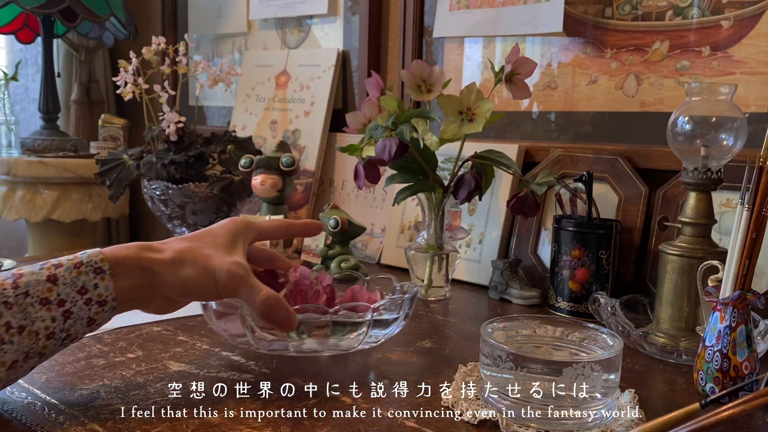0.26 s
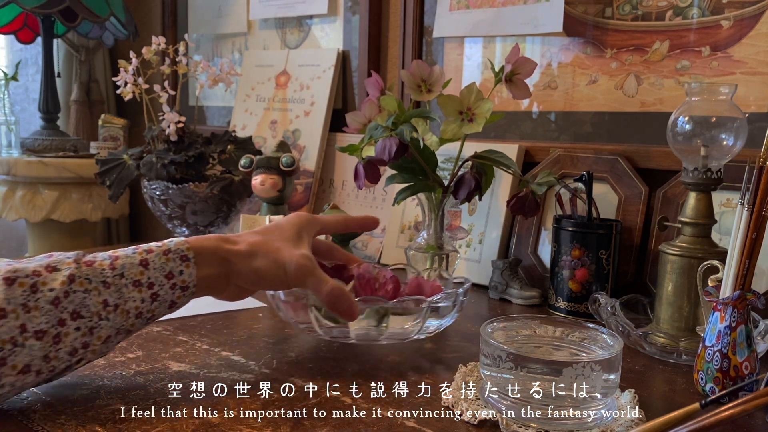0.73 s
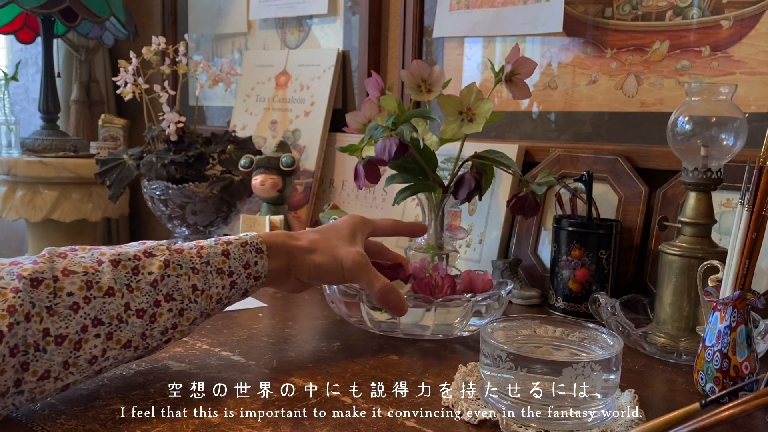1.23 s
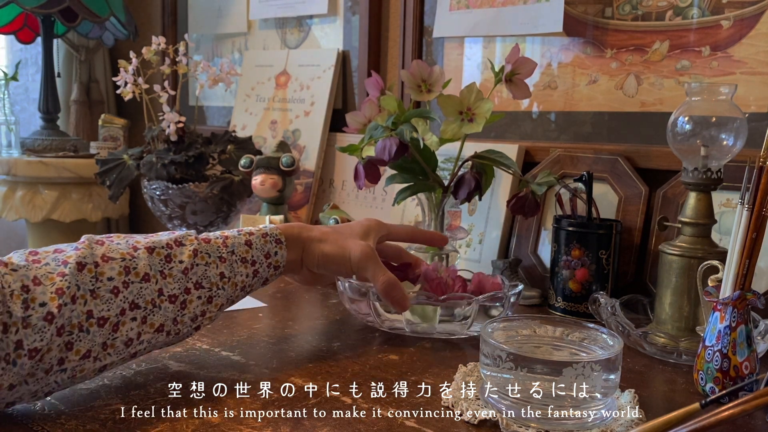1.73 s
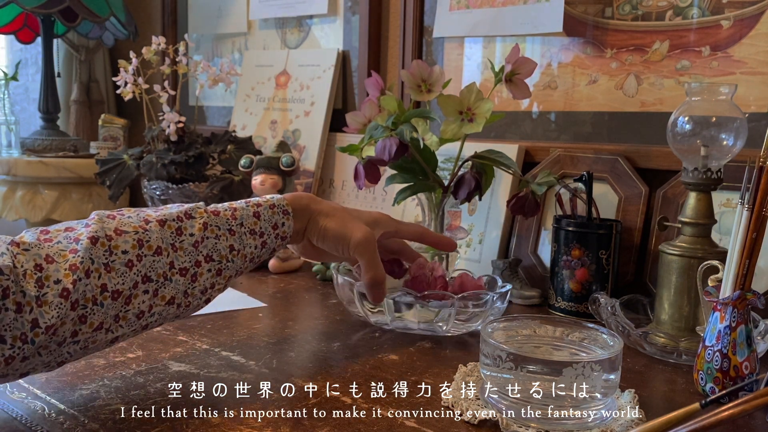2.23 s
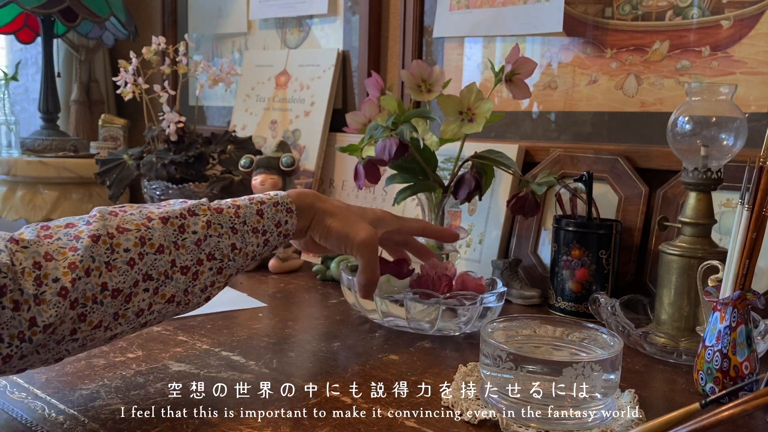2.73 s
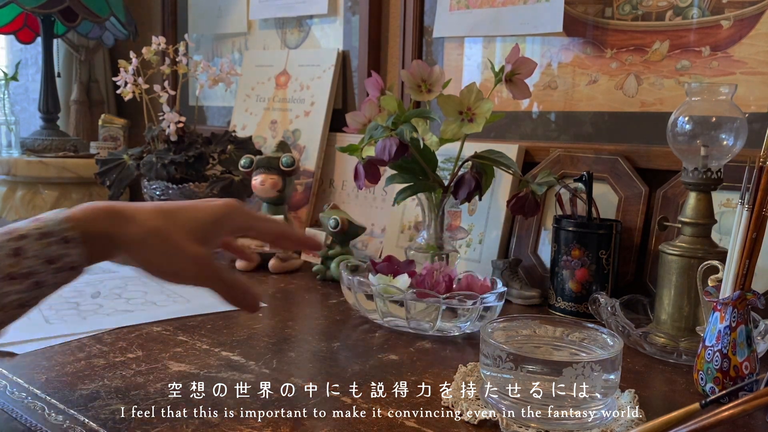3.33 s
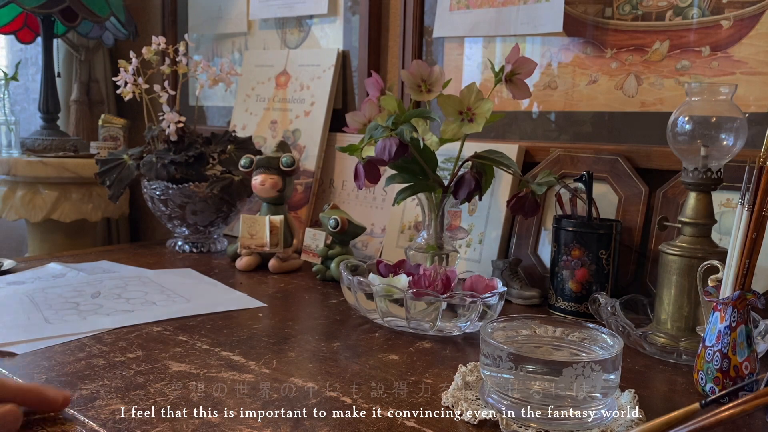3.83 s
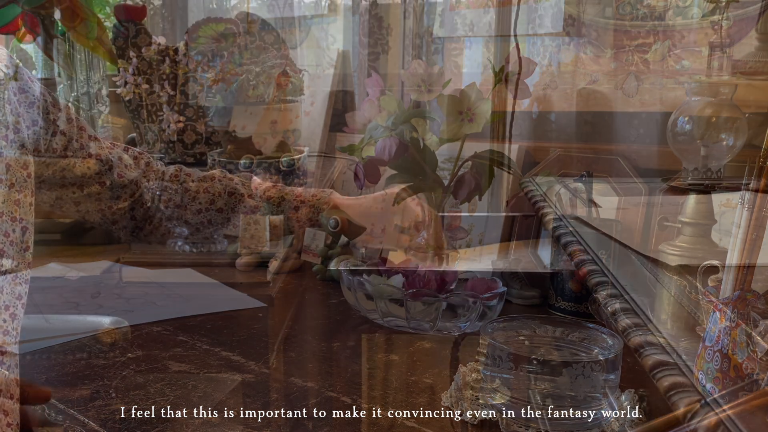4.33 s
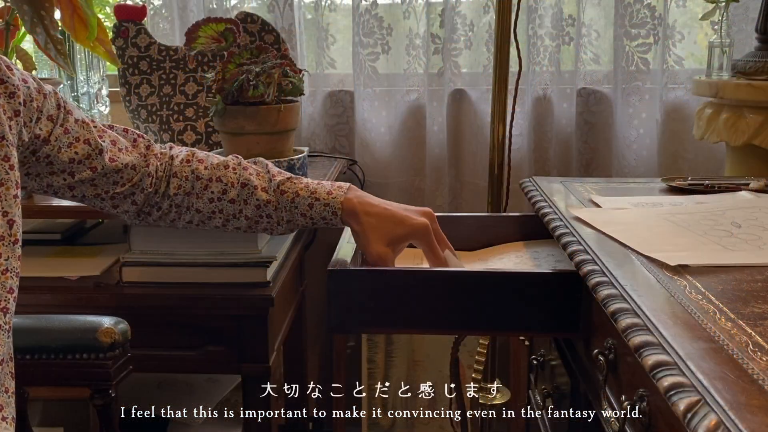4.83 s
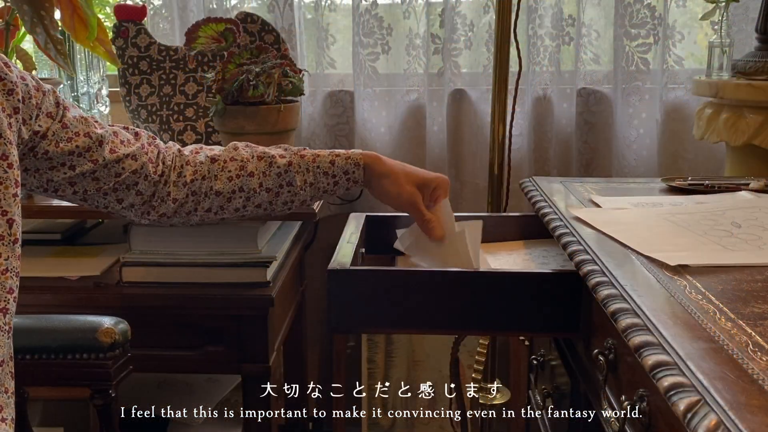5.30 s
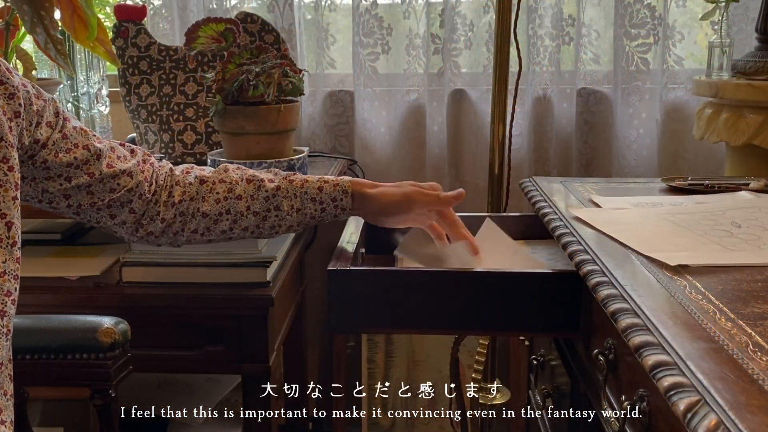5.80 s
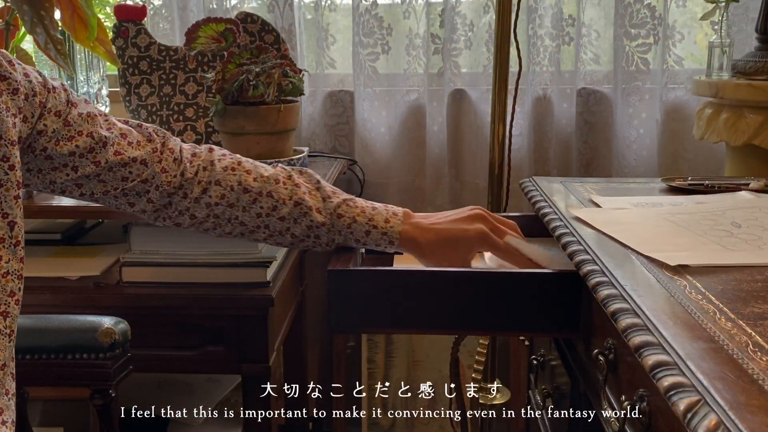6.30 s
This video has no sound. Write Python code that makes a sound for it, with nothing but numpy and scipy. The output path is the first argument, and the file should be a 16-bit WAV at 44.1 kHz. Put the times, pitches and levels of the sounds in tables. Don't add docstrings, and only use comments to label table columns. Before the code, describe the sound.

Faint gritty sliding of glass on wood, one solid bump, a lull, then a hand leafing through crackling paper in a hollow wooden drawer.

```python
import sys
import numpy as np
from scipy import signal
from scipy.fft import rfft, irfft
from scipy.io import wavfile
from scipy.ndimage import uniform_filter1d

SR = 44100
rng = np.random.default_rng(int(sys.argv[2]) if len(sys.argv) > 2 else 0)


def pcm_store(signal):
    levels = np.round(np.clip(np.atleast_2d(signal), -1, 1) * 32767)
    wavfile.write(sys.argv[1], SR, levels.astype(np.int16).T)


def linear_from_db(decibels):
    return 10 ** (np.asarray(decibels, float) / 20)


N = 289296
TIME = np.arange(N) / SR
HZ = np.fft.rfftfreq(N, 1 / SR) + 1
LEFT_RIGHT = np.array([[1], [-1]])

# (time [s], hiss level [dB])
REST = [(3.43, -67), (3.53, -73), (3.67, -56.5), (3.92, -55), (4.14, -57.5), (4.4, -62), (4.53, -59.5),
        (4.72, -55.5), (4.84, -51.5), (5.08, -44.5), (5.24, -51.5), (5.42, -51.5), (5.68, -48.5),
        (5.85, -52), (6, -49), (6.22, -46), (6.39, -49.5), (6.56, -44.5)]


def unit(x):
    return x / np.sqrt(np.mean(x ** 2))


def on_log(points):
    hz, value = np.transpose(points)
    return np.interp(np.log(HZ), np.log(hz), value)


def curves(table):
    s, *columns = np.transpose(table)
    return [np.interp(TIME, s, column) for column in columns]


def band(x, lo_hz, hi_hz, order=2):
    limits = [lo_hz, min(hi_hz, .45 * SR)]
    return signal.sosfilt(signal.butter(order, limits, "band", fs=SR, output="sos"), x)


def colour(x, points):
    return unit(irfft(rfft(x) * linear_from_db(on_log(points)), N))


def walk(rate):
    hold = int(SR / rate)
    steps = np.repeat(rng.standard_normal(N // hold + 1), hold)
    return 1.3 * uniform_filter1d(steps, hold)[:N]


def wide_noise():
    # (pitch [Hz], share [0-1])
    alike = [(60, 0.99), (200, 0.8), (700, .1), (2400, .4), (5000, 0.3),
             (7200, .995), (17000, .995)]
    share = np.clip(on_log(alike), 0, 1)
    mid, side = rfft(rng.standard_normal((2, N)))
    return irfft(mid * np.sqrt(1 + share) + side * np.sqrt(1 - share) * LEFT_RIGHT, N)


def grit(rate, spread_db, smear_ms):
    sizes = linear_from_db(spread_db * np.minimum(rng.exponential(size=N), 3))
    slips = (rng.random(N) < rate / SR) * sizes
    return unit(1 + signal.lfilter([1], [1, -np.exp(-1000 / (smear_ms * SR))], slips))


def fade(t, t60):
    return np.exp(-np.log(1000) * t / t60)


def add(out, s, piece):
    i = int(s * SR)
    out[..., i:i + piece.shape[-1]] += piece[..., :N - i]


def placed(x):
    # (time [s], left minus right [dB])
    hand_side = [
        (0.0, 11.5),
        (0.49, 12),
        (1.0, 8),
        (1.51, 11),
        (2.5, 0),
        (3.23, 5.5),
        (3.82, 1.5),
        (6.56, 3),
    ]
    lean = linear_from_db(curves(hand_side)[0] * LEFT_RIGHT / 2) - 1
    below_treble = np.clip((7000 - HZ) / 1500, 0, 1)
    return x + lean * irfft(rfft(x) * below_treble, N)


def still_air():
    # (pitch [Hz], level per Hz [dB])
    air_tone = [(150, -28.5), (250, -1.5), (450, -6.5), (1110, -16), (1780, -17), (2680, -20.5),
                (7000, -25.5), (11000, -27), (14000, -32), (16500, -41.5)]
    return linear_from_db(-70.5) * colour(wide_noise(), air_tone)


def stirring():
    # (time [s], rumble level [dB])
    stir_level = [(0.0, -53.5), (0.51, -59), (0.8, -57), (1.5, -53.5), (1.94, -60.5), (2.85, -66),
                  (3.69, -56.5), (3.95, -60.5), (4.62, -56.5), (5.06, -49), (5.68, -55), (6.08, -58),
                  (6.36, -53.5), (6.56, -45)]
    # (pitch [Hz], level per Hz [dB])
    rumble_tone = [(12, -57.5), (20, -27.5), (37, -10), (60, -1), (86, -7), (118, -5), (195, -13),
                   (316, -17), (500, -40), (650, -72.5), (1100, -120)]
    level = linear_from_db(curves(stir_level)[0] + 1.6 * walk(6.5))
    return level * colour(wide_noise(), rumble_tone)


def scraping():
    # (time [s], scrape level [dB])
    slide_level = [
        (0.0, -62.5),
        (0.43, -64.5),
        (0.96, -58),
        (1.45, -61.5),
        (1.6, -67),
        (1.95, -69),
        (2.4, -96),
        (3.05, -73.5),
        (3.42, -71.5),
    ]
    # (pitch [Hz], level per Hz [dB])
    scrape_tone = [(250, -28), (450, 3), (1000, -1.5), (1900, -2), (3000, -2.5), (4200, -4.5), (6000, -11),
                   (9000, -6), (13000, -15.5), (16000, -21)]
    scrape = colour(wide_noise() * grit(270, .6, 1.2), scrape_tone)
    return linear_from_db(curves(slide_level)[0] + 0.36 * walk(33)) * scrape * (TIME < 3.42)


def desk_bumps():
    # (time [s], peak level [dB], contact [ms])
    blows = [
        (1.2753, -7.5, 1.94),
        (1.2916, -18, 2.8),
        (1.305, -18.5, 4.5),
        (1.579, -47.5, 2.4),
        (1.833, -45.5, 2.2),
        (6.288, -33, 1),
    ]
    # (pitch [Hz], level [dB], t60 [s], left minus right [dB])
    desk_notes = [(108, -4.5, .26, -0.5), (159.2, -7, .2, 0), (194, -13, .2, 0), (226.8, -10.5, .2, 1),
                  (285.3, -11.5, .13, 4), (319, -10, 0.19, -5), (367.3, -3, .13, 2), (407.7, -16, 0.18, -8),
                  (439.6, -8, .12, -7), (495, -11, .1, 0), (539, -5, .065, -8), (597, -9.5, .05, -6),
                  (739, -23, .1, 0)]
    out, t = np.zeros((2, N)), np.arange(int(.5 * SR)) / SR
    top = np.zeros((2, len(t)))
    for k, (hz, db, t60, lean_db) in enumerate(desk_notes):
        swing = (-1) ** k
        sides = linear_from_db(db + lean_db * LEFT_RIGHT / 2)
        top += swing * sides * np.sin(2 * np.pi * hz * t) * fade(t, t60)
    for s, db, ms in blows:
        push = np.hanning(max(int(ms * SR / 1000), 3))
        blow = signal.fftconvolve(top, push[None])
        add(out, s, linear_from_db(db + 4.0) * blow / np.abs(blow).max())
    return out


def tones(table):
    out, t = np.zeros((2, N)), np.arange(int(.5 * SR)) / SR
    for s, db, hz, t60 in table:
        rise = 1 - np.exp(-t * hz / 0.87)
        add(out, s, linear_from_db(db) * np.sin(2 * np.pi * hz * t) * rise * fade(t, t60) * (1 - t / t[-1]))
    return out


def frame_thumps():
    # (time [s], peak level [dB], pitch [Hz], t60 [s])
    thumps = [(1.2742, -6, 451, .024), (1.278, -16, 134, 0.17), (1.293, -17, 70, 0.3),
              (1.58, -32.5, 60, 0.2), (1.62, -28, 132, 0.069), (1.647, -25.5, 71.4, 0.12),
              (1.837, -27, 124, .1), (1.867, -28, 79.5, 0.062), (4.65, -40, 108, 0.11),
              (4.859, -33.5, 121, .12), (5.15, -47, 203, 0.24), (6.409, -31.5, 109, 0.085),
              (6.29, -31, 385, .13), (5.335, -40, 375, .12), (3.61, -45.5, 260, .09),
              (6.075, -38.5, 210, 0.089)]
    return tones(thumps)


def bowl_ring():
    # (time [s], level [dB], pitch [Hz], t60 [s])
    rings = [
        (1.288, -59, 5150, 0.16),
        (1.812, -54, 5200, 0.061),
        (1.831, -51.5, 1320, .13),
        (1.833, -60, 1370, .1),
        (2.291, -79, 1314, .3),
        (2.82, -74, 1330, 2.5),
        (2.81, -73, 5200, 0.2),
        (2.81, -77, 2610, 0.12),
    ]
    return tones(rings)


def bursts(table, rise_ms, ring, apart, crack):
    low, high = np.zeros((2, N)), np.zeros(N)
    t = np.arange(int(.2 * SR)) / SR
    for s, db, hz, wood_db, sheen_db, t60 in table:
        rise = 1 - np.exp(-t * 1000 / rise_ms)
        shape = rise * (fade(t, max(t60, .004)) + crack * fade(t, 0.002))
        near, far = rng.standard_normal((2, len(t))) * shape
        both = near + apart * band(far, 200, 6000, order=3) * LEFT_RIGHT
        reach_hz = np.interp(sheen_db, [-28, -12], [4800, 8000])
        sheet = band(both, 1080, reach_hz, order=3) + ring * band(both, .95 * hz, 1.05 * hz, order=1)
        wood = band(both, 600, 1550)
        sheen = band(band(near, 6500, 17000, order=3), 5600, 10500, order=1)
        add(low, s, linear_from_db(db) * (sheet / np.abs(sheet).max() + linear_from_db(wood_db) * wood / np.abs(wood).max()))
        add(high, s, linear_from_db(db + sheen_db + 8.0) * sheen / np.abs(sheen).max())
    return placed(low) + high


def lasting(table, t60, t60_per_db):
    return [(*row, t60 - t60_per_db * row[1]) for row in table]


def snaps():
    # (time [s], peak level [dB], ring pitch [Hz], wood [dB], sheen [dB])
    snap_events = [(0.0974, -43, 1400, -9, -3), (0.1732, -36, 2170, -8, 1.5), (1.7844, -50, 940, -5, -11),
                   (1.8093, -38, 2080, -3.5, -6), (3.4288, -43, 1100, -15, -22),
                   (3.5167, -53.5, 1050, 11, -18), (4.2178, -39.5, 1030, 8, -19),
                   (4.4342, -19, 4560, -1, -38.5), (4.5824, -27.5, 1490, 2.5, -24),
                   (4.872, -7, 1780, -6.5, -19.5), (4.9855, -16.5, 5900, -23, -14),
                   (5.0045, -27, 1100, 1, -30), (5.078, -34, 1400, -6, -30), (4.961, -26, 3320, -28, -12),
                   (4.9839, -13, 985, -41, -40), (5.3088, -3.5, 7100, -22, -15.5),
                   (5.5695, -44, 7420, -17, -11), (5.7375, -19, 6300, -21, -13.5),
                   (5.7555, -41, 2620, -12, -9), (5.877, -18, 2160, -7, -36),
                   (5.8844, -26.5, 1960, -2, -34), (6.0662, -11, 1610, -7, -40),
                   (6.0733, -12.5, 2010, -15, -27.5), (6.2858, -13.5, 4530, -11, -16),
                   (6.2892, -7, 7800, -17, -16), (6.3422, -25, 1200, 1, -30),
                   (6.3557, -27.5, 1300, -2, -30), (6.3996, -26.5, 1070, -21, -20)]
    cracks = lasting(snap_events, 0.028, -0.0018)
    return bursts(cracks, rise_ms=0.075, ring=3.8, apart=0.55, crack=3.03)


def scuffs():
    # (time [s], peak level [dB], ring pitch [Hz], wood [dB], sheen [dB])
    shivers = [
        (0.0396, -51.5, 1600, -0.5, -11),
        (0.076, -49.5, 4840, -10, -10),
        (0.1144, -51.5, 4540, -4, -13),
        (0.178, -48, 1250, 4.5, -4.5),
        (0.3844, -56, 1980, -12, -5),
        (1.276, -42, 803, 10.5, -16.5),
        (1.285, -40, 1900, -12.5, -14),
        (1.5788, -61, 1070, 2, -36),
        (1.8144, -52, 1300, -16, -24),
        (3.2196, -61.5, 1190, -20, -8),
    ]
    # (time [s], peak level [dB], ring pitch [Hz], wood [dB], sheen [dB])
    scuff_events = [(3.5983, -34.5, 1090, -7, -13), (3.6707, -37.5, 2800, -6, -12),
                    (4.417, -34.5, 3520, -3.5, -9), (4.442, -24, 4590, -35, -38),
                    (4.5956, -31.5, 650, -14, -24), (4.8745, -17, 1830, -8.5, -10),
                    (4.8854, -26, 1660, -27, -23), (4.8944, -28, 1810, -14, -21),
                    (4.9783, -19, 4320, -30, -8), (4.9904, -21, 1056, -9, -16),
                    (5.0024, -26, 1100, -15, -33), (5.156, -27, 4240, -21, -7),
                    (5.313, -24.5, 1280, -11, -7), (5.3409, -28, 4830, -15, -11),
                    (5.7938, -31.5, 4130, -13, -22), (6.0794, -17.5, 700, -8, -37),
                    (6.0944, -27, 694, -13, -32), (6.2946, -16, 2330, -6, -22), (6.3487, -32, 760, -2, -13),
                    (6.3985, -31.5, 1040, -1, -18), (6.069, -18, 1050, -11, -36),
                    (6.289, -18, 3550, -12, -22)]
    swells = lasting(shivers, .08, 0) + lasting(scuff_events, .006, .0019)
    return bursts(swells, rise_ms=3.4, ring=3.4, apart=.4, crack=0)


def bends():
    # (start time [s], length [s], pitch [Hz], level [dB])
    bend_events = [(0.698, .5, 2700, -70), (0.751, 0.4, 3400, -71), (3.51, .17, 1050, -58.5),
                   (3.887, 0.18, 2100, -59), (3.93, .08, 6600, -56), (3.93, .09, 3100, -60),
                   (4.03, .06, 1200, -57), (4.165, .11, 1070, -55), (4.163, 0.054, 7300, -51),
                   (4.2, 0.17, 3300, -58), (4.551, 0.073, 1036, -51.5), (4.82, 0.063, 1850, -50.5),
                   (4.89, .08, 1800, -51), (4.96, .025, 3300, -44), (5.07, .09, 4200, -48.5),
                   (5.46, 0.056, 3700, -51), (5.569, .025, 7400, -46), (5.8, 0.073, 4380, -55),
                   (5.89, 0.2, 4400, -51), (6.06, 0.19, 4500, -50.5), (6.248, .035, 4400, -44),
                   (6.295, .045, 2350, -43), (6.401, .025, 1050, -45), (6.42, .04, 2700, -45),
                   (6.46, .05, 2350, -47), (3.21, .025, 1200, -75)]
    out, width = np.zeros((2, N)), .07
    for s, length, hz, db in bend_events:
        near, far = rng.standard_normal((2, int(length * SR)))
        both = band(near + .5 * far * LEFT_RIGHT, hz * (1 - width), hz * (1 + width))
        add(out, s, linear_from_db(db) * unit(both) * np.sqrt(np.hanning(len(near))))
    return placed(out)


def hollow(x):
    # (pitch [Hz], width [Hz], level [dB])
    drawer_notes = [(381.6, 10, 5.5), (656, 28, -10.5), (914, 32, -0.5), (1045, 33, 5), (1596, 11, 6),
                    (1825, 33, -23)]
    ringing = sum(linear_from_db(db) * band(x, hz - wide / 2, hz + wide / 2, order=1) for hz, wide, db in drawer_notes)
    return unit(ringing + linear_from_db(-2.0) * band(x, 188, 2000))


def dragging(rest_db, steep, part, tilt=1):
    # (time of crest [s], hiss [dB], fall [s], hollow [dB], sheen [dB])
    strokes = [(3.53, -74.5, .14, 15.5, -10), (3.61, -49, 0.078, 0.5, -12.5), (3.843, -49, 0.024, -1, -2.5),
               (3.958, -47.5, .08, -14, -10), (4.059, -47.5, .1, -8, -16), (4.31, -52.5, 0.093, -5, -11),
               (4.587, -45.5, 0.078, 1.5, -4.5), (4.8, -55.5, .1, 11.5, -4), (5.128, -44, .04, -15.5, -4.5),
               (5.167, -39.5, 0.033, -17, -8), (5.285, -46.5, .03, -11, -2.5), (5.42, -59.5, 0.15, 10.5, 0),
               (5.501, -47.5, 0.051, -7, -12), (5.58, -48.5, 0.028, -9, 2.5), (5.685, -52, 0.053, -1.5, -7),
               (5.745, -51, 0.039, -8, 5), (5.796, -41.5, 0.027, -11, -5.5), (6.268, -39, 0.073, -4.5, -11),
               (6.468, -38, 0.066, -3.5, -10)]
    # (time of crest [s], hiss [dB], fall [s], hollow [dB], sheen [dB])
    tugs = [
        (3.437, -59, 0.057, 2.5, -24),
        (4.18, -47, 0.23, -5.5, -6),
        (4.445, -43.5, .06, -7.5, -10),
        (4.885, -43.5, .06, 7.5, -8),
        (4.999, -37.5, 0.066, 4, -12),
        (5.325, -38.5, 0.057, -8.5, -8),
        (5.89, -48, 0.063, 0.5, -18.5),
        (6.1, -42, .09, -0.5, -20),
        (6.31, -34.5, 0.061, -1, -24),
        (6.41, -41, 0.094, 4.5, -10),
    ]
    middle_db, drop_db = -52.5, 12
    roundness = 1.52
    t = np.arange(0, N / SR + .002, .001)
    weight_db = np.interp(t, *np.transpose(REST)) - middle_db
    power = linear_from_db(2 * (middle_db + rest_db + tilt * weight_db))
    drags = [(.8 * row[2], row) for row in strokes] + [(.026, row) for row in tugs]
    for rise_s, (s, db, fall_s, *parts_db) in drags:
        away = np.where(t < s, (s - t) / rise_s, (t - s) / fall_s)
        loss_db = steep * drop_db * np.minimum(away, 8) ** roundness
        power = power + linear_from_db(2 * (db + [0, *parts_db][part] - loss_db))
    return np.interp(TIME, t, np.sqrt(power))


def leafing():
    # (pitch [Hz], level per Hz [dB])
    paper_tone = [(710, -10), (1200, -8), (1730, -5.5), (2110, -2.5), (2570, -1.5), (4310, -0.5),
                  (6080, -4.5), (7330, -11.5), (8500, -6), (11000, -12), (18700, -120)]
    # (pitch [Hz], level per Hz [dB])
    sheen_tone = [(5800, -20.5), (7200, -5.5), (8500, -8), (11000, -7.5), (15500, -9.5), (17000, -33)]
    slips = wide_noise() * grit(1500, .5, .6)
    paper = colour(slips, paper_tone)
    hiss = np.zeros((2, N))
    for hz in (1000, 1800, 3200, 5800):
        hiss += linear_from_db(1.4 * walk(10)) * band(paper, hz, 1.8 * hz, order=1)
    low = unit(hiss) * dragging(0, 1, part=0)
    low = low + hollow(slips) * dragging(-7.5, 1.6, part=1) * linear_from_db(0.47 * walk(12))
    high = colour(slips, sheen_tone) * dragging(-11.5, 1.8, part=2, tilt=1.28) * linear_from_db(5.0)
    return (placed(low) + high) * (TIME > REST[0][0])


def room(x):
    echoes = wide_noise() * fade(TIME, .3) * (TIME > .004)
    echoes = echoes / np.sqrt(np.mean(np.sum(echoes ** 2, axis=1)))
    # (pitch [Hz], level [dB])
    walls = [(100, -6.0), (300, -1.5), (560, -5), (900, -1.0), (5000, -5.0), (16000, -25.5)]
    return linear_from_db(-4.5) * irfft(rfft(echoes) * linear_from_db(on_log(walls)) * rfft(x.mean(axis=0)), N)


def scene():
    desk = band(desk_bumps() + frame_thumps() + bowl_ring(), 55, 8926)
    hits = snaps() + scuffs() + desk * linear_from_db(.3 * LEFT_RIGHT)
    background = still_air() + stirring() + scraping()
    return hits + room(hits) + leafing() + bends() + background


def top_cut(x):
    return signal.sosfilt(signal.butter(12, 16990, fs=SR, output="sos"), x)


def record(dry):
    turn = np.exp(-1j * np.pi * np.maximum(HZ - 6920, 0) / 4280)
    top_db = -30 * np.clip((HZ - 15800) / 300, 0, 1) - 35 * np.clip((HZ - 16700) / 300, 0, 1)
    ports = irfft(rfft(dry) * linear_from_db(top_db) * np.array([turn, turn.conj()]), N)
    return top_cut(ports)


dry = scene()
out = record(dry)
pcm_store(out)
```